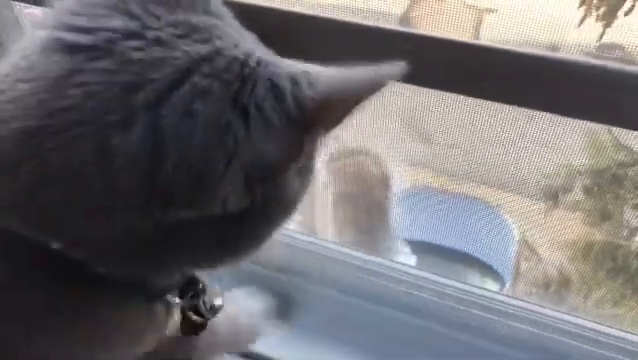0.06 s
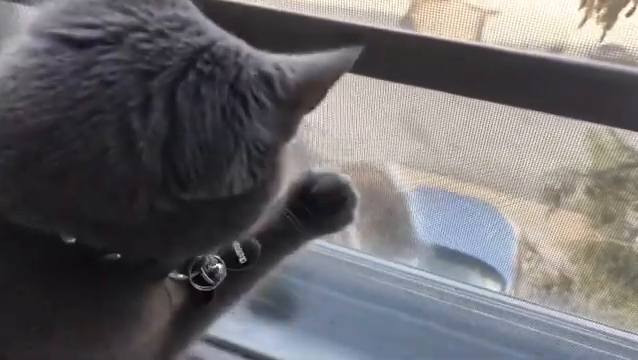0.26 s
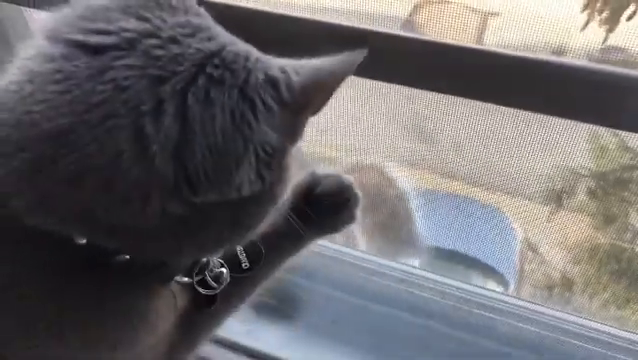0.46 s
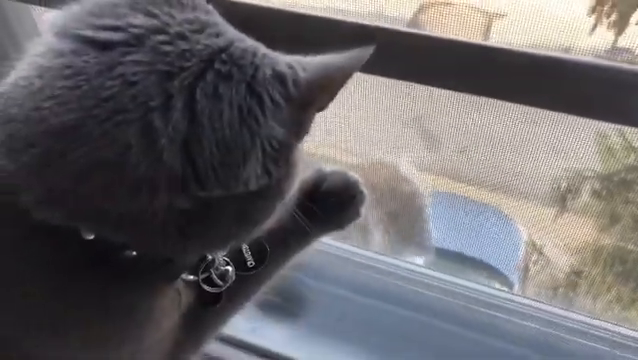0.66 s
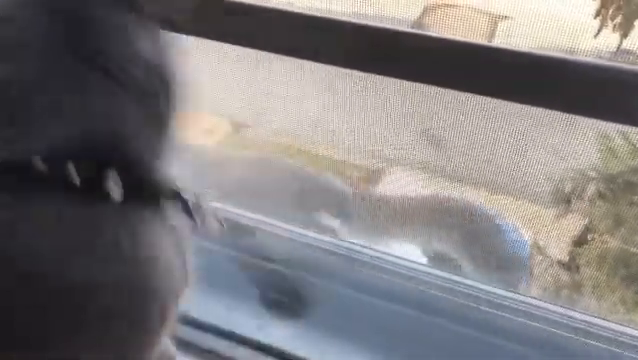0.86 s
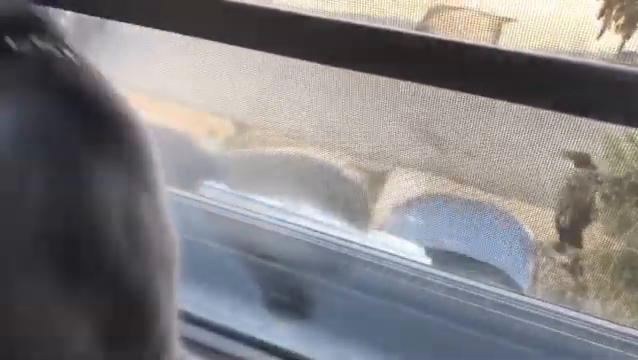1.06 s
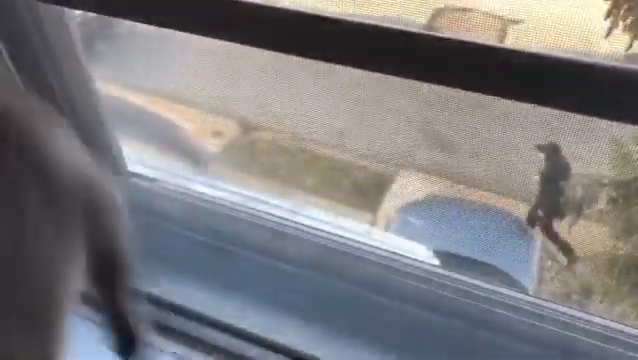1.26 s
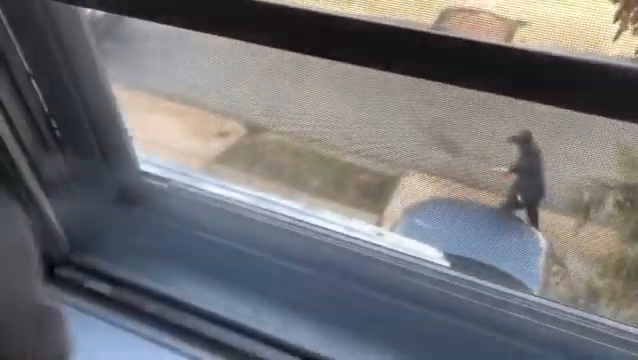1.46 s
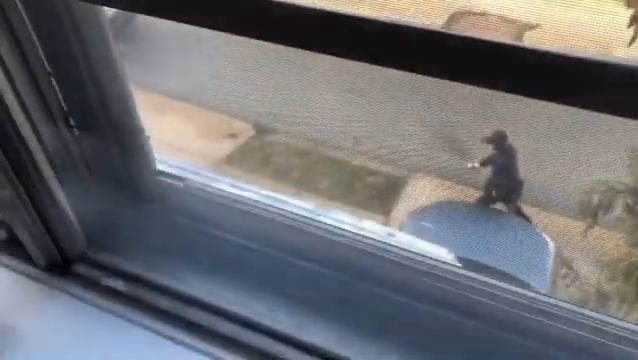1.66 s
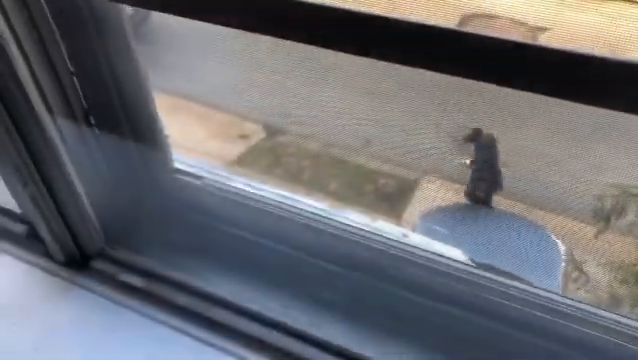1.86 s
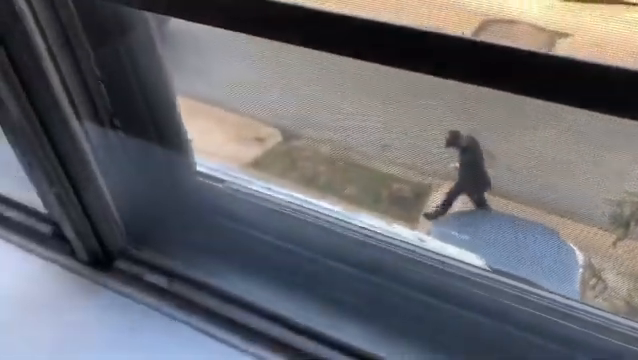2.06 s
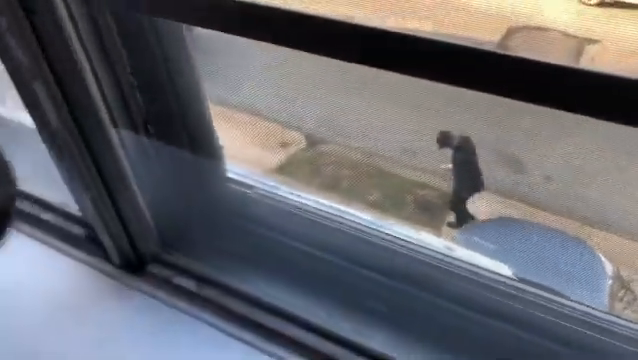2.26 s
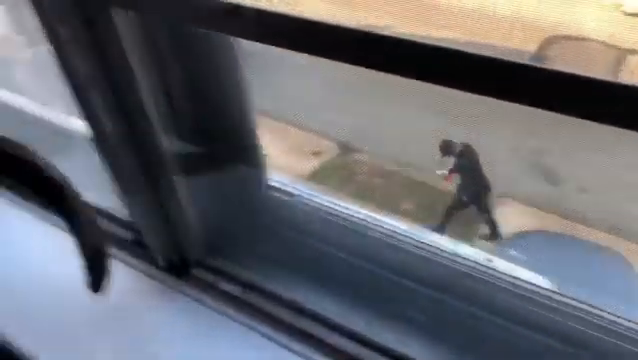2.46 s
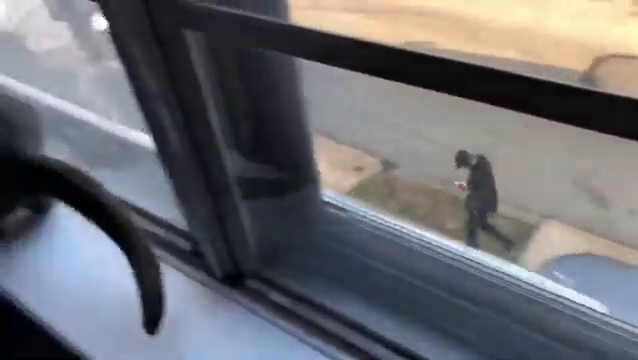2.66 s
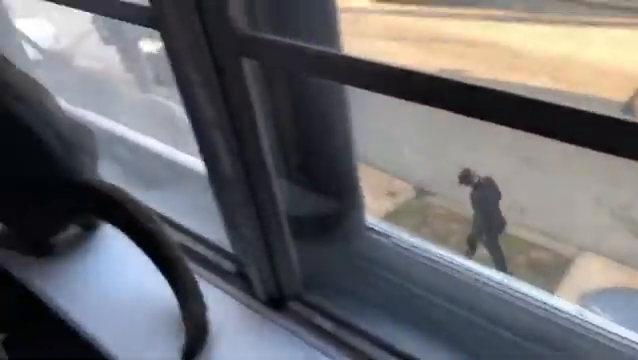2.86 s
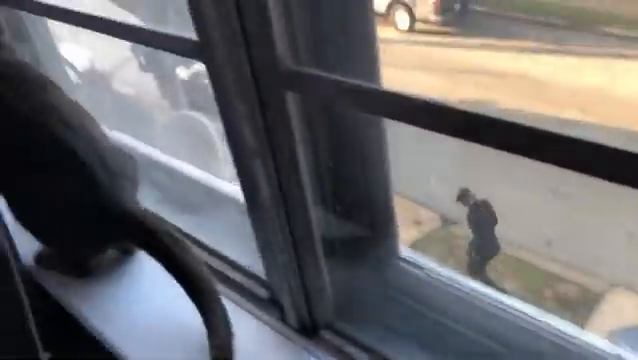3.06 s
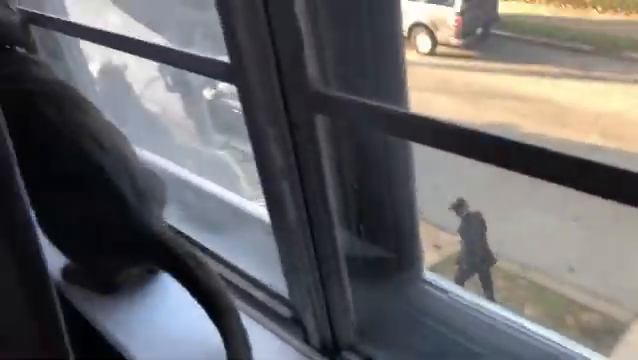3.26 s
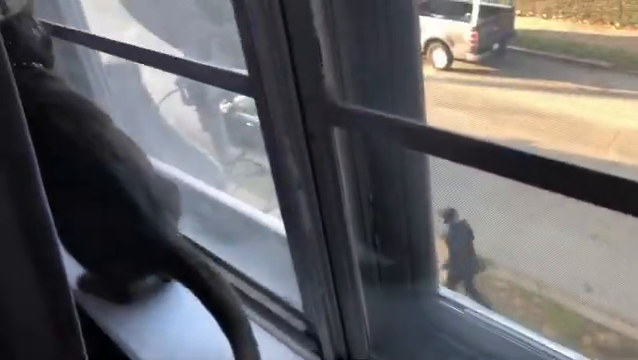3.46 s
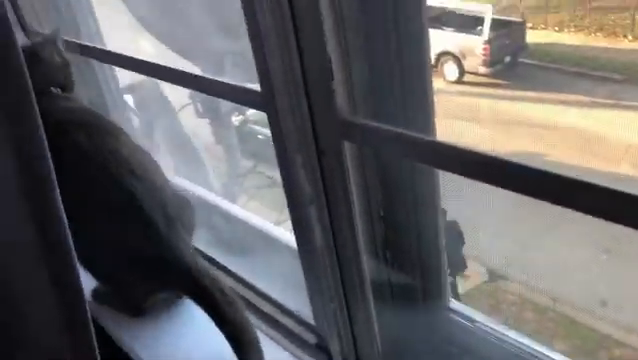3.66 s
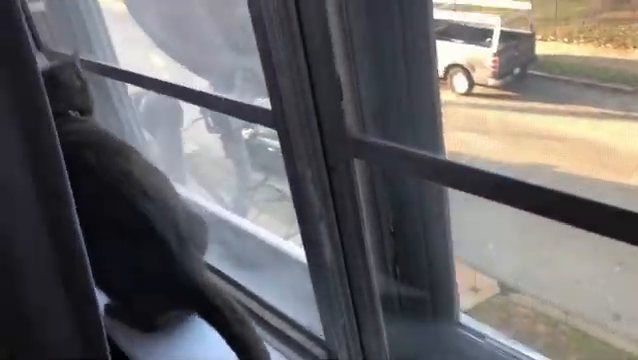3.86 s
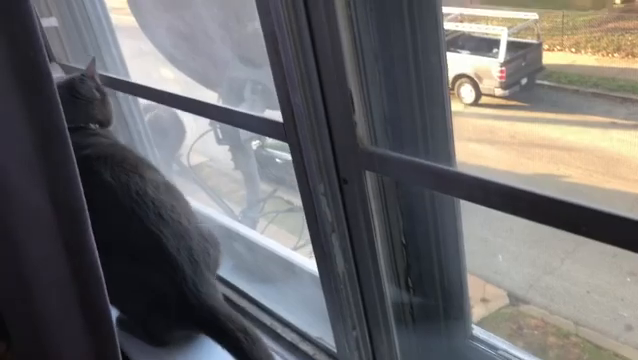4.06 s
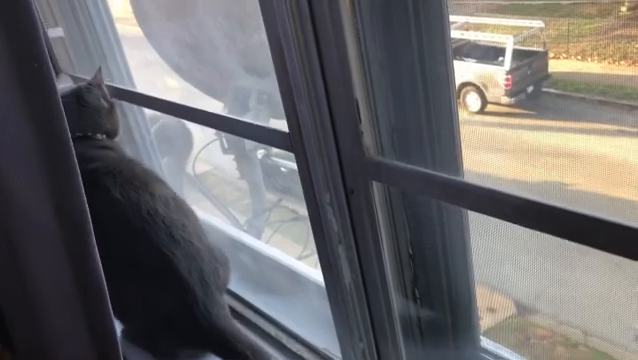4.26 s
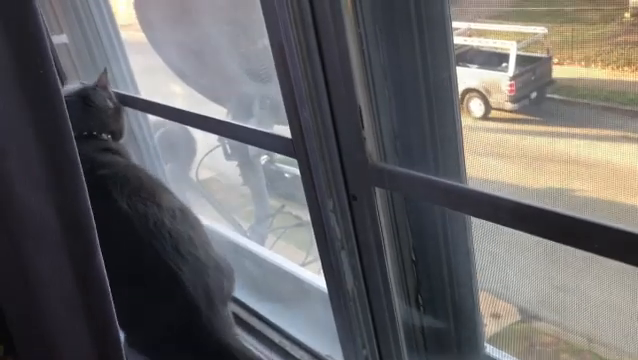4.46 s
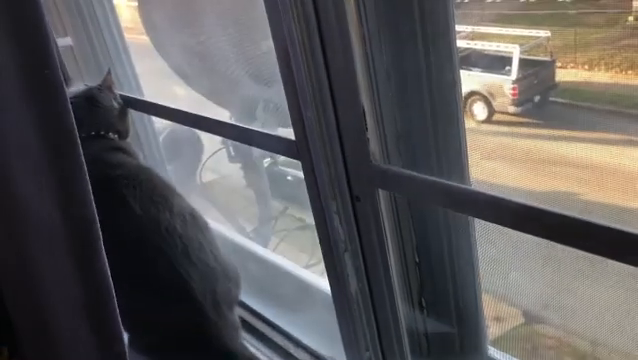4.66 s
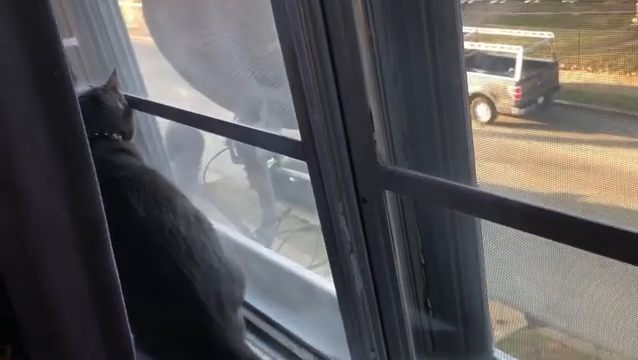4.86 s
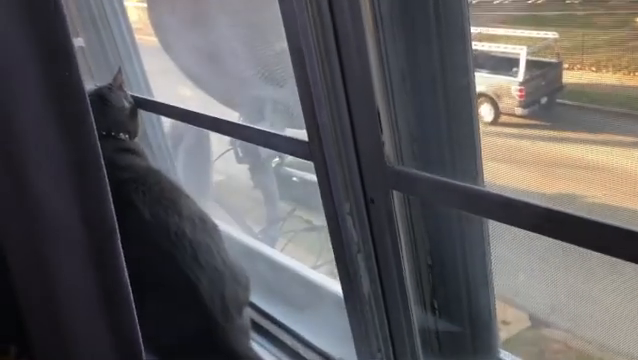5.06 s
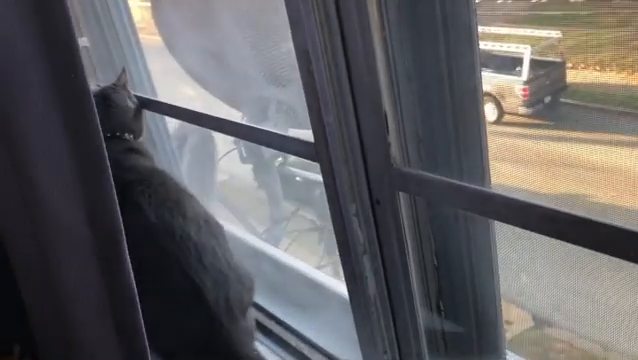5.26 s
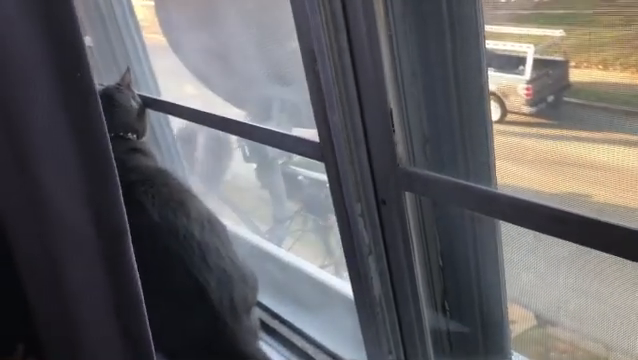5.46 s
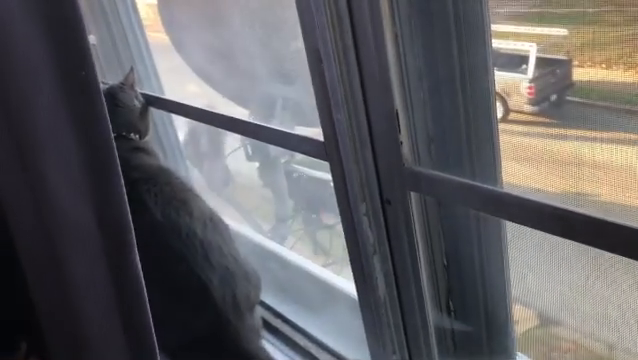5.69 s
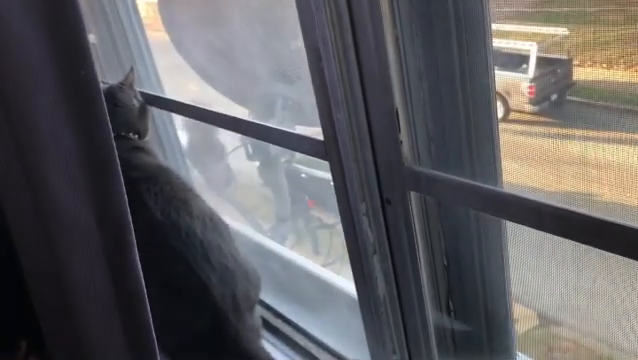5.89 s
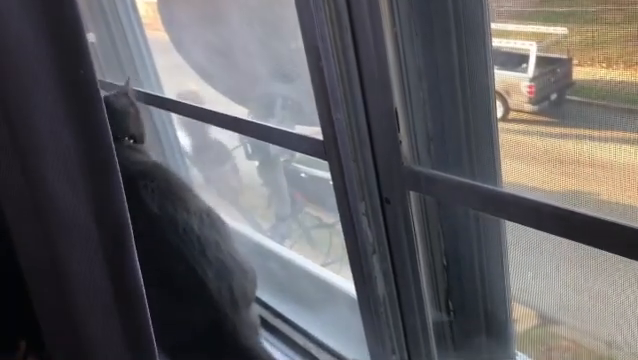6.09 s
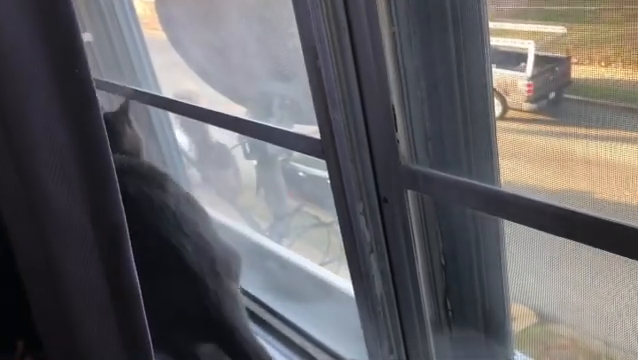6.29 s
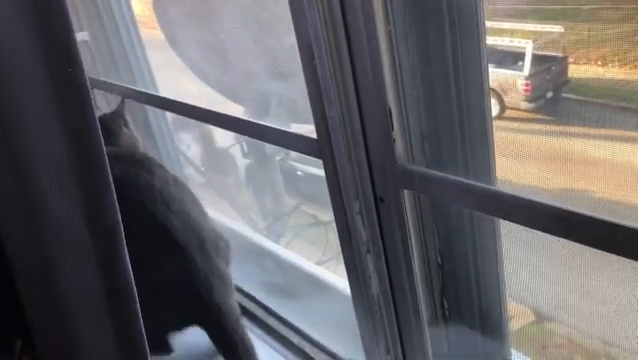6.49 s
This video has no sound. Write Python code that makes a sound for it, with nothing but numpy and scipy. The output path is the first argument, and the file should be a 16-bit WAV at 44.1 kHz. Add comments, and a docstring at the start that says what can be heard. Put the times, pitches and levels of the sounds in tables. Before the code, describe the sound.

Very close in a small furnished room, a cat's thin metal tags jingle in a short quick burst, pause, then rattle harder with two sharp loud clacks of tag and claw on the window sill. Soft paw thuds and fur whispers follow, then only sparse faint claw ticks over a dull low hum.

```python
"""Little metal tags clink brightly over claw ticks, soft paw thuds and whispers of fur; a quiet room hums behind.
A cat moves on a window sill with a phone held near it. Each tag rings as a few decaying sine modes behind a
noise crack, and loose tags shiver as sparse touches through resonances. Claws snap noise through the sill's
resonances, pads swing a sagging low tone, and fur is banded noise and tiny slips. Room noise and an echo surround it."""
import sys
import numpy as np
from scipy import signal
from scipy.fft import rfft, irfft, next_fast_len
from scipy.io import wavfile

SR = 44100
rng = np.random.default_rng(int(sys.argv[2]) if len(sys.argv) > 2 else 0)


def wrap_up_sound(samples):
    """Save the sound to the file named by the first command line argument, as 16-bit audio."""
    columns = np.atleast_2d(samples).T
    # keep every value between -1 and 1, then stretch to whole-number steps
    tamed = np.clip(columns, -1, 1)
    steps = np.round(tamed * 32767).astype(np.int16)
    wavfile.write(sys.argv[1], SR, steps)


N = 287973
T = np.arange(N) / SR  # time [s]

# ring modes of the main and top tags, before each blow's scatter: (pitch [Hz], level [dB], t60 [s])
MAIN_TAG_MODES = [(9610, -6.5, 0.011), (9740, -5.5, 0.078), (10400, -11, 0.027), (10500, -12.5, .02),
                  (11730, -12.5, 0.018), (13500, -12, 0.0095), (13100, -13.5, .02)]
TOP_TAG_MODES = [(15350, -6, 0.04), (15128, -4, .065)]


def undb(db):
    """Gain of a level in dB."""
    return 10 ** (np.asarray(db) / 20)


def unit(x):
    """Scaled to rms 1."""
    return x / np.sqrt(np.mean(x ** 2))


def band(x, hz, width):
    """Resonance of gain 1 at its centre, with its width in Hz."""
    return signal.lfilter(*signal.iirpeak(hz, hz / width, SR), x)


def steep(x, lo_hz, hi_hz):
    """Band-pass with steep skirts."""
    sos = signal.butter(3, [lo_hz, min(hi_hz, .45 * SR)], "bandpass", fs=SR, output="sos")
    return signal.sosfilt(sos, x)


def coloured(x, points):
    """Spectrum shaped to (Hz, dB) points, joined along log frequency, rms 1."""
    hz, db = np.transpose(points)
    n = next_fast_len(len(x))
    f = np.arange(n // 2 + 1) * SR / n + 1  # 1 Hz up, to keep the logarithm finite
    shape = undb(np.interp(np.log(f), np.log(hz), db, -90, -90))
    return unit(irfft(rfft(x, n) * shape, n)[:len(x)])


def fading(t, t60):
    """Exponential decay of 60 dB in t60 s, never quicker than 4 ms."""
    return np.exp(-np.log(1000) * t / max(t60, .004))


def swell(strokes, rise):
    """Gain of summed bell-shaped strokes; a share of each length rises, the rest falls."""
    power = 0
    for s, db, length in strokes:
        side = max(length, .01) * np.where(T < s, rise, 1 - rise)
        power = power + undb(2 * db) * np.exp(-((T - s) / side) ** 2)
    return np.sqrt(power)


def grains(per_s, spread_db):
    """Random tiny contacts as single-sample clicks, a few much stronger than the rest; rms 1."""
    chance, strength, sign = rng.random((N, 3)).T
    hits = chance < per_s / SR
    return unit(hits * undb(-spread_db * np.log(1 - strength)) * np.sign(sign - .5))


def add(out, s, sound):
    """Mixes a short sound in at time s."""
    i = int(s * SR)
    out[i:i + len(sound)] += sound[:N - i]


def room_tone():
    """Dull air noise, with narrow noise bands as the wavering hum of the house."""
    # spectrum of the air noise: (frequency [Hz], relative level [dB per Hz])
    air_colour = [(12, -62), (20, -44.5), (43, -9.5), (81, -6.5), (93, -8), (113, 1.5), (141, -13),
                  (234, -7), (262, -8.5), (292, -8.5), (387, -14.5), (511, -17.5), (1030, -26.5),
                  (1360, -32), (15900, -51)]
    # humming bands: (centre [Hz], width [Hz], rms level [dB])
    hum_bands = [(109.9, 7.7, -61.5), (177.6, 20, -62.5), (229, 25, -66.5)]
    air_db = -57.5  # rms
    hum = sum(undb(db) * unit(band(rng.standard_normal(N), hz, width)) for hz, width, db in hum_bands)
    return undb(air_db) * coloured(rng.standard_normal(N), air_colour) + hum


def brush():
    """Hair-size slips and a swish catch and let go band by band, lifted around each stroke's own centre."""
    # strokes of fur and paw along the frame: (peak time [s], level [dB], length [s], centre [Hz])
    strokes = [(0.033, -53.5, 0.067, 3970), (0.331, -53.5, 0.015, 5000), (0.931, -55, 0.072, 5000),
               (1.126, -49, 0.043, 5800), (1.175, -45, .05, 5800), (1.202, -51.5, 0.022, 3920),
               (1.236, -48, 0.054, 4760), (1.412, -53.5, 0.098, 3400), (1.598, -67, 0.029, 5000),
               (1.66, -60.5, 0.034, 2500), (1.735, -59, 0.03, 3500), (1.869, -55.5, 0.13, 3900),
               (2.02, -64, 0.082, 4500), (2.15, -60.5, 0.025, 1970), (2.212, -60.5, 0.047, 5200),
               (2.387, -61.5, 0.04, 2190), (2.412, -71, 0.025, 5700), (2.47, -66.5, 0.081, 5800),
               (2.93, -70, 0.13, 3380), (3.117, -68.5, 0.082, 4500), (4.1, -72, .11, 5000),
               (4.359, -63.5, 0.043, 4990), (4.593, -67.5, 0.058, 4790), (4.978, -67.5, 0.061, 4960),
               (5.248, -68.5, 0.074, 5530), (5.296, -68.5, 0.038, 5500)]
    # tone common to all strokes: (frequency [Hz], relative level [dB])
    fur_colour = [(400, -26.5), (900, -13), (2000, -4), (3500, -14.5), (5400, -13.5), (6600, -11.5),
                  (7800, -22.5), (13000, -26.5), (15800, -33)]
    rise = .37  # share of a stroke's length spent rising
    catch_db = 4.5  # unevenness of the grip
    focus_db, focus_octaves = 9, .22  # lift and reach of a stroke's centre
    out, (colour_hz, colour_db) = np.zeros(N), np.transpose(fur_colour)
    slips = grains(1500., 2.8)
    for s, db, length, centre_hz in strokes:
        i = slice(max(int((s - 2 * length) * SR), 0), int((s + 3 * length) * SR))
        t, rub = T[i], 0
        knots = t[::SR // 160]  # the grip changes 160 times a second
        for hz in 500 * 2 ** np.arange(0, 5, 1 / 3):  # third-octave steps
            grip_db = catch_db * np.interp(t, knots, rng.standard_normal(len(knots)))
            near_db = focus_db * np.exp(-(np.log2(hz / centre_hz) / focus_octaves) ** 2)
            tone_db = np.interp(np.log(hz), np.log(colour_hz), colour_db)
            # shifting the slips gives each band its own contacts
            friction = .65 * np.roll(slips, int(hz))[i] + .75 * rng.standard_normal(len(t))
            rub = rub + undb(tone_db + near_db + grip_db) * band(friction, hz, hz / 5) * np.sqrt(hz)
        side = length * np.where(t < s, rise, 1 - rise)
        out[i] += undb(db) * unit(rub) * np.exp(-.5 * ((t - s) / side) ** 2)
    return out


def ring(modes, scatter_db=4.5):
    """One blow excites each mode differently; the ring dies fast in contact, then flutters until caught."""
    detune = .004  # spread of a mode's pitch from blow to blow, as a share
    held_s, held_db = .018, -14  # typical time until fur or another tag catches the ring, and its drop
    t = T[:SR // 5]
    luck = rng.standard_normal((len(modes), 2))
    free = .7 + .5 * rng.random()  # this blow's share of the nominal decay times
    tone = 0
    for (hz, db, t60), (level_luck, pitch_luck) in zip(modes, luck):
        sine = np.sin(2 * np.pi * hz * (1 + detune * pitch_luck) * t)
        tone = tone + undb(db + scatter_db * level_luck) * sine * fading(t, t60 * free)
    knots = t[::SR // 250]
    flutter = undb(1.8 * np.interp(t, knots, rng.standard_normal(len(knots))))
    caught_s = held_s * (.4 + 1.2 * rng.random())
    held = undb(held_db * np.clip((t - caught_s) / .003, 0, 1))
    onset = np.minimum(t / 0.00068, 1)
    return held * tone * onset * (0.38 * flutter + 1.1 * fading(t, 0.027))


def clinks():
    """Tags strike: a bright crack with a weaker tail of rebounds, a dull tap on the collar, and three rings."""
    # tag against tag: (time [s], level [dB], kind of blow)
    strikes = [(0.0364, -37, "edge"), (0.044, -34, "both"), (0.057, -35, "main"), (0.066, -30.5, "main"),
               (.075, -36, "edge"), (.083, -35, "top"), (0.0937, -37, "main"), (0.125, -30.5, "top"),
               (0.1295, -29, "both"), (.138, -33, "edge"), (.146, -42.5, "top"), (0.16, -33.5, "edge"),
               (0.177, -19.5, "edge"), (.183, -27, "low"), (0.192, -27.5, "low"), (0.195, -23.5, "main"),
               (.212, -44, "low"), (0.219, -45.5, "low"), (0.249, -36.5, "edge"), (0.279, -24, "both"),
               (0.2967, -29.5, "main"), (0.3014, -11.5, "main"), (.3037, -23, "low"), (.319, -23.5, "both"),
               (0.3311, -29, "main"), (0.3707, -40.5, "main"), (.403, -38.5, "main"), (0.419, -49, "main"),
               (0.434, -59, "main"), (.878, -42, "edge"), (0.8862, -20.5, "top"), (0.8884, -14, "edge"),
               (.899, -21, "main"), (0.907, -24.5, "main"), (0.914, -23.5, "main"), (0.9195, -18, "top"),
               (.925, -24.5, "edge"), (0.936, -27, "both"), (0.9462, -16, "edge"), (0.953, -26, "main"),
               (0.9624, -32.5, "both"), (0.9795, -25, "main"), (0.989, -27.5, "both"),
               (0.996, -29.5, "edge"), (1, -33, "edge"), (1.0177, -33, "main"), (1.029, -30, "edge"),
               (1.048, -38.5, "both"), (1.06, -38, "edge"), (1.0715, -17, "both"), (1.1001, -2.5, "edge"),
               (1.1527, -31.5, "main"), (1.291, -36, "top"), (1.318, -40, "edge"), (1.3294, -29, "edge"),
               (1.345, -37.5, "edge"), (1.3804, -3, "low"), (1.514, -45, "main"), (1.6848, -49, "main"),
               (1.753, -44, "top"), (1.774, -44, "top"), (1.888, -35.5, "both"), (2.077, -60, "top"),
               (2.128, -52.5, "top"), (2.385, -45.5, "main"), (2.395, -49, "main"), (2.4603, -40.5, "low"),
               (2.549, -49, "both"), (2.6, -46, "top"), (2.8699, -51, "both"), (2.895, -51, "main"),
               (2.9603, -55.5, "main"), (2.9832, -62, "main"), (3.1413, -63, "main"), (4.525, -51, "both"),
               (4.5962, -61, "main"), (4.668, -46.5, "main"), (4.716, -60.5, "main"),
               (5.2695, -43.5, "edge")]
    # how strongly each tag rings, by kind of blow: (main tag [dB], top tag [dB], low tag [dB])
    blow_levels = {"main": (-3, -24, -34.5), "top": (-17.5, -6, -28), "low": (-21, -5, -10.5),
                   "both": (-10.5, -14, -25.5), "edge": (-18, -23.5, -27)}
    # ring mode of the low tag, before each blow's scatter: (pitch [Hz], level [dB], t60 [s])
    low_tag_modes = [(7530, 0.0013, 0.046)]
    out, t = np.zeros(N), T[:SR // 5]
    for s, db, kind in strikes:
        main_db, top_db, low_db = blow_levels[kind]
        burst = rng.standard_normal(len(t)) * (fading(t, 0.011) + undb(-16.5) * fading(t, 0.089))
        bright = steep(burst, 8500., 14000.) + 2.4 * band(burst, 9700., 920.0)
        crack = bright + undb(-23.5) * steep(burst, 700., 8700.0)  # the dull collar tap
        tags = undb(main_db) * ring(MAIN_TAG_MODES) + undb(top_db) * ring(TOP_TAG_MODES)
        tags = tags + undb(low_db) * ring(low_tag_modes)
        add(out, s, undb(db) * (tags + undb(-6.5) * crack / np.abs(crack).max()))
    return out


def shiver():
    """Loose tags touch faintly: sparse contacts excite modes damped by fur, among tiny bright noise ticks."""
    # tags shivering against each other: (peak time [s], level [dB], length [s])
    shakes = [(.07, -53, 0.039), (.2, -43, 0.014), (.32, -56, 0.057), (.42, -67, 0.029), (.97, -51.5, 0.13),
              (1.15, -44.5, 0.15), (1.33, -59.5, 0.043), (1.53, -67, 0.042), (1.76, -62.5, 0.2),
              (1.9, -67.5, 0.079), (2.14, -75, 0.072), (2.42, -73.5, 0.13), (2.58, -70, 0.14),
              (2.75, -73, 0.072), (2.95, -70.5, 0.25), (3.15, -77, 0.14), (4.65, -72.5, .15),
              (5.27, -83, 0.11)]
    gain, out = swell(shakes, .35), 0
    for modes, tag_db in (MAIN_TAG_MODES, -20), (TOP_TAG_MODES, -22):
        touch = grains(60., 3.5) * gain
        # wide resonances: much shorter rings than after a free blow
        rings = sum(undb(db) * band(touch, hz, 10. / t60) * np.sqrt(t60 * SR) for hz, db, t60 in modes)
        out = out + undb(tag_db) * rings
    t = T[:SR // 50]
    burst = rng.standard_normal(len(t)) * fading(t, .015)
    tick = signal.fftconvolve(grains(150., 2) * gain, burst)[:N]
    return out + undb(-19.0) * steep(tick, 8800., 14000.0)


def ticks():
    """A claw snaps on the sill: an uneven noisy burst, a brief pitch, a low knock and the frame's short ring."""
    # claw on the sill: (time [s], level [dB], centre [Hz], t60 [s])
    taps = [(.1266, -49, 2560, 0.016), (0.1761, -34, 6700, 0.03), (0.2737, -32.5, 3920, 0.039),
            (0.279, -33, 3940, 0.018), (.3292, -50, 6350, 0.037), (1.008, -50, 3740, 0.065),
            (1.0586, -34.5, 3650, 0.024), (1.0712, -14, 6200, 0.032), (1.1012, -3.5, 7030, 0.017),
            (1.1015, -1.5, 5696, 0.02), (1.121, -37, 5794, .025), (1.161, -30, 6060, 0.041),
            (1.21, -41, 4400, 0.046), (1.2228, -28.5, 5400, 0.023), (1.2335, -45, 5000, .03),
            (1.246, -25.5, 4100, 0.022), (1.256, -41, 4800, 0.02), (1.29, -36.5, 5600, 0.039),
            (1.3805, -13.5, 4200, 0.051), (1.8484, -34, 3740, 0.026), (1.8596, -31, 2900, 0.044),
            (1.8714, -39, 2580, 0.022), (1.9156, -26, 4360, 0.037), (1.935, -45, 2500, 0.12),
            (1.985, -31.5, 3830, 0.064), (2.1443, -44, 5640, 0.042), (2.155, -44.5, 3570, .05),
            (2.2065, -54, 5500, .03), (2.277, -55, 2490, 0.019), (2.3366, -31.5, 4480, 0.048),
            (2.34, -44.5, 2000, 0.073), (2.4516, -42.5, 2460, 0.1), (2.474, -49, 5800, 0.046),
            (2.599, -61, 4000, 0.033), (2.7976, -36.5, 6380, 0.034), (2.807, -43, 6400, 0.043),
            (2.9074, -53.5, 6300, 0.026), (3.022, -57.5, 2570, 0.052), (3.0938, -34.5, 6200, 0.028),
            (3.097, -43.5, 2900, 0.074), (3.663, -60.5, 4580, 0.028), (3.674, -61, 2620, 0.032),
            (3.9965, -38, 6260, 0.061), (4.157, -64.5, 4500, 0.023), (4.3116, -29.5, 4730, 0.056),
            (4.5475, -33.5, 4940, 0.066), (4.5611, -47.5, 2500, 0.046), (4.9113, -34.5, 5480, 0.042),
            (4.9688, -57, 5000, .03), (5.1754, -45.5, 4762, 0.045), (5.2293, -62.5, 5500, .03),
            (5.2896, -56.5, 5500, .03), (6.2097, -50, 2980, 0.025), (6.2105, -54.5, 1910, 0.043),
            (6.315, -63, 2200, 0.043)]
    # resonances of the sill, before each tap's scatter: (centre [Hz], width [Hz], level [dB])
    sill_modes = [(916, 93, -3.5), (1331.6, 210, -1.5), (1900, 190, -5), (2892, 240, -8.5), (4830, 28, -2),
                  (5428, 1400, -2.5), (6440, 576, -11.5), (6580, 223, -16.5)]
    # knock under a -35 dB tick at 4 kHz; weaker for bright, hard ticks
    knock_db, knock_db_per_octave, knock_db_per_db = -5, -5.5, -0.2773
    # snap width of a -35 dB tick as a share of its centre; harder ticks are broader
    snap_width, snap_width_db_per_db = 0.52, .15
    # clear pitch of a -35 dB tick as a share of its snap; harder ticks have less
    ping, woody_db_per_db = .55, -.3
    out, t = np.zeros(N), T[:SR // 8]
    for s, db, hz, t60 in taps:
        harder_db = db + 35
        low_db = knock_db + knock_db_per_octave * np.log2(hz / 4000) + knock_db_per_db * harder_db
        width = hz * snap_width * undb(snap_width_db_per_db * harder_db)
        woody = undb(woody_db_per_db * harder_db)  # soft taps ring at one pitch, hard ones splash
        # the tip skids in tiny jumps
        skid = undb(2 * np.repeat(rng.standard_normal(len(t) // 64 + 1), 64)[:len(t)])
        envelope = fading(t, t60) * np.minimum(t / 0.00064, 1) * skid
        scrape, push = rng.standard_normal((2, len(t))) * envelope
        # every spot rings its own way
        luck = rng.standard_normal((len(sill_modes), 2))
        sill = [(f * (1 + .03 * c), w, g + 3 * d) for (f, w, g), (c, d) in zip(sill_modes, luck)]
        ringing = sum(undb(g) * band(scrape, f, w) for f, w, g in sill)
        focused = band(band(ringing, hz, 3.6 * width), hz, 2.2 * width)
        snap = steep(band(scrape, hz, width) + np.sqrt(woody) * focused, 1200.0, 8000.)
        snap = snap + undb(-26) * scrape / woody  # unfiltered splash
        knock = 0.66 * push + sum(undb(g) * band(push, f, w) for f, w, g in sill)
        knock = steep(knock, 450., 2400.0)
        tone = ping * woody * np.sin(2 * np.pi * hz * t) * fading(t, t60) * np.minimum(t / .001, 1)
        sound = tone + snap / np.abs(snap).max() + undb(low_db) * knock / np.abs(knock).max()
        add(out, s, undb(db) * sound)
    return out


def thuds():
    """A soft pad pushes the sill, which swings as a decaying sine and rumbles."""
    # paw pad landing: (time [s], level [dB], settled pitch [Hz])
    landings = [(0.281, -44.5, 125), (.935, -38, 666), (0.974, -40.5, 447), (1.007, -37, 249),
                (1.103, -41, 422.7), (1.104, -37.5, 127.8), (1.381, -40, 403), (1.382, -29, 896),
                (1.818, -37, 650), (1.817, -26, 224), (1.841, -32.5, 168), (1.862, -30, 520),
                (1.869, -26, 285), (1.8715, -21, 503), (1.881, -28.5, 135), (1.929, -36, 166.5),
                (1.987, -35, 178), (2.017, -40, 181)]
    t60_at_200_hz, t60_power = 0.087, 0.97  # [s]; higher thuds die sooner
    sag, sag_s = 0.2, 0.0087  # the pitch starts this share high and settles with this time constant
    out, t = np.zeros(N), T[:SR // 4]
    for s, db, hz in landings:
        t60 = t60_at_200_hz * (200 / hz) ** t60_power
        rumble = unit(steep(rng.standard_normal(len(t)), 150.0, 800.)) * fading(t, 1.7 * t60)
        swing = np.sin(2 * np.pi * hz * (t + sag * sag_s * (1 - np.exp(-t / sag_s))))
        envelope = fading(t, t60) * np.minimum(t / 0.0044, 1)
        add(out, s, undb(db) * (swing + undb(-6.5) * rumble) * envelope)
    return out


def echo(x):
    """Small furnished room: a dense decaying noise tail; curtains and carpet swallow the treble."""
    room_t60_s, room_db = 0.13, -17
    t = T[:SR // 2]
    tail = rng.standard_normal(len(t)) * fading(t, room_t60_s) * np.clip(t / 0.00095, 0, 1)
    tail = signal.sosfilt(signal.butter(2, 5000., fs=SR, output="sos"), tail)
    tail = tail / np.sqrt(np.sum(tail ** 2))  # unit energy
    return signal.fftconvolve(x, tail)[:N] * undb(room_db)


def scene():
    """The cat, its echo and the room."""
    cat = brush() + clinks() + shiver() + ticks() + thuds()
    return (cat + echo(cat) + room_tone())[None]


def record(dry):
    """The phone rounds the loudest peaks, droops at the very top and then cuts off."""
    rounded = np.tanh(dry)
    droop = signal.sosfilt(signal.butter(16, 15800, fs=SR, output="sos"), rounded)
    return signal.sosfilt(signal.ellip(10, .2, 80, 16500, fs=SR, output="sos"), droop)


dry = scene()
out = record(dry)
wrap_up_sound(out)
```